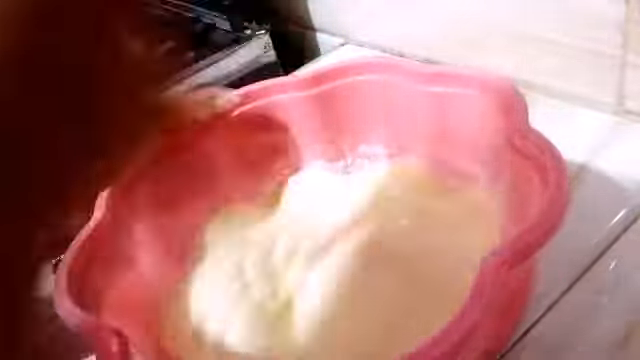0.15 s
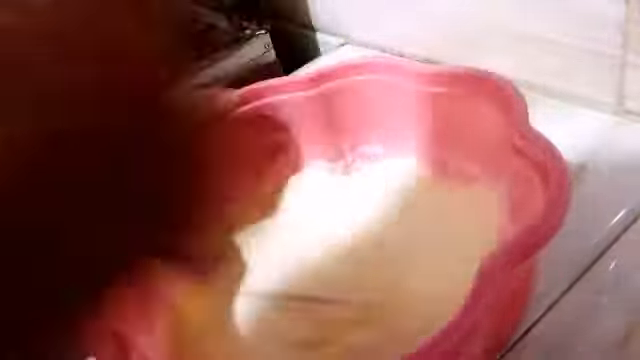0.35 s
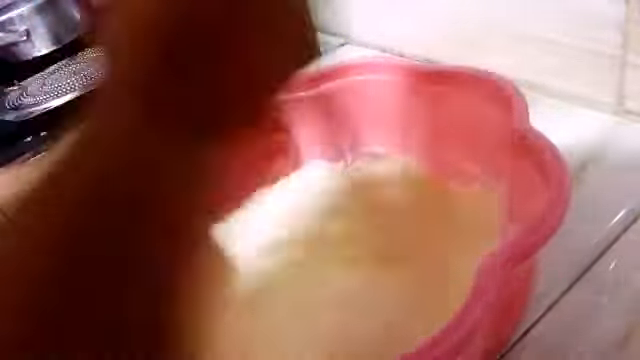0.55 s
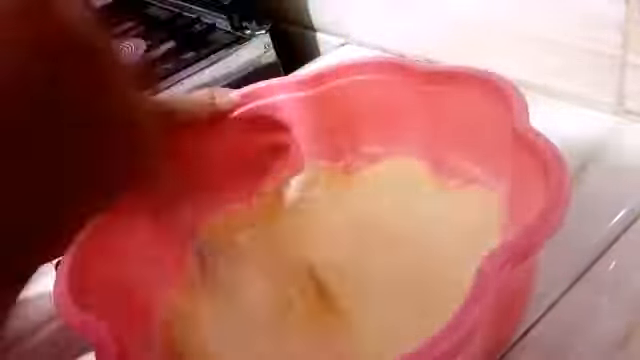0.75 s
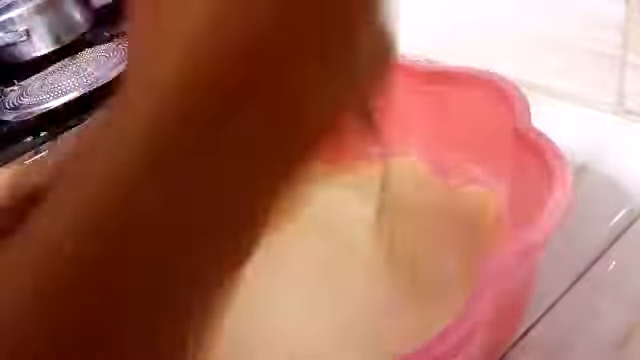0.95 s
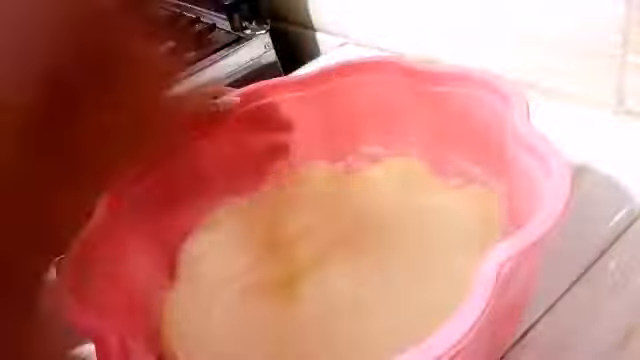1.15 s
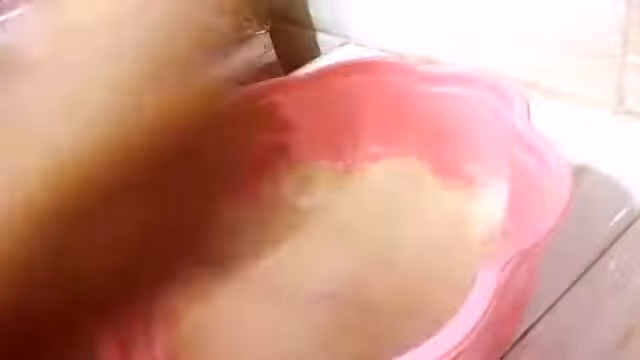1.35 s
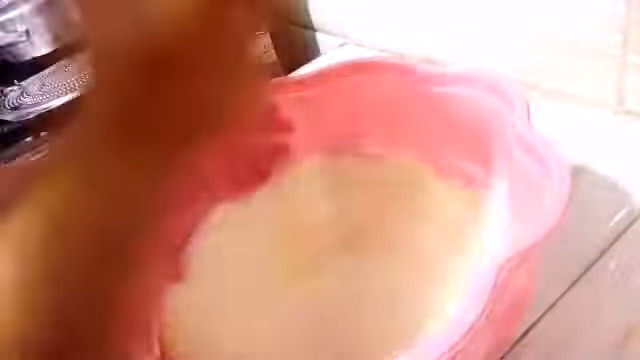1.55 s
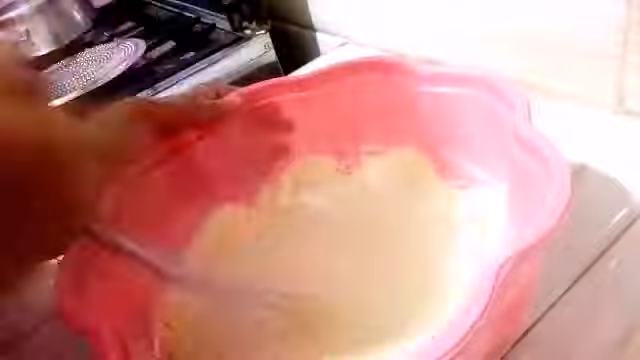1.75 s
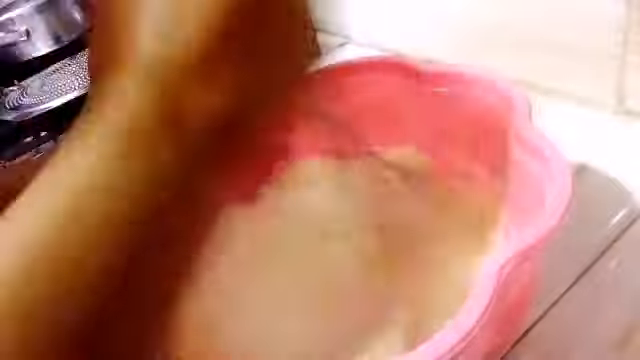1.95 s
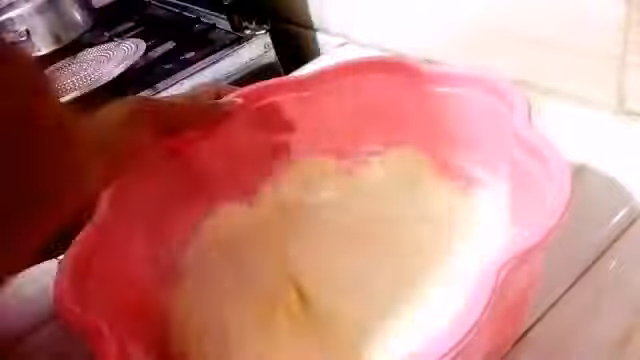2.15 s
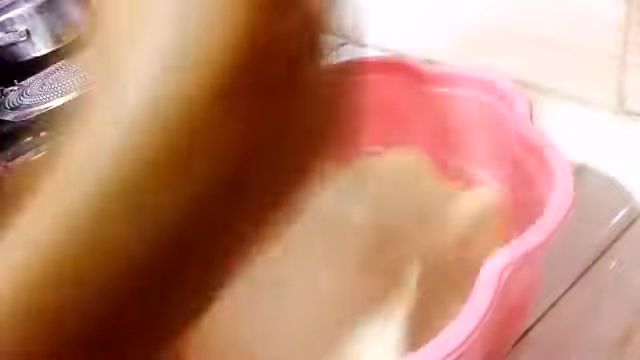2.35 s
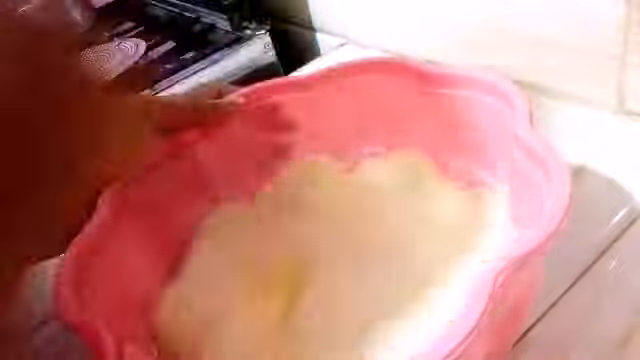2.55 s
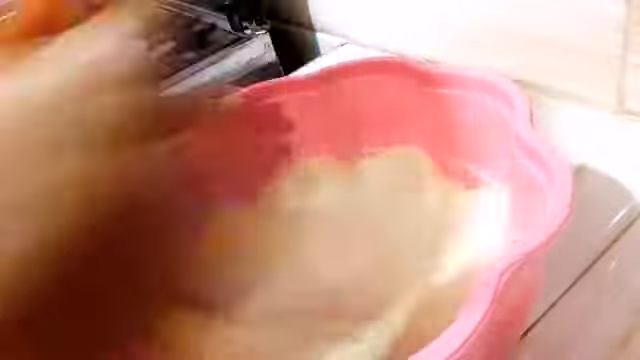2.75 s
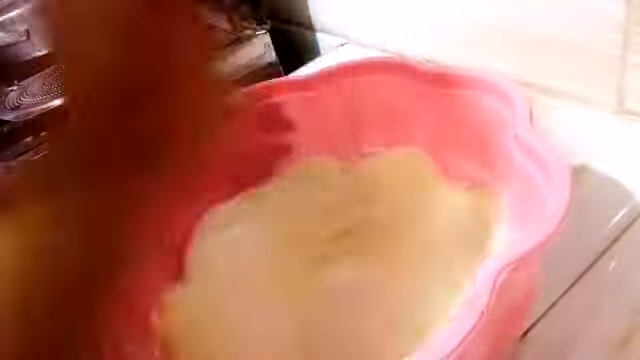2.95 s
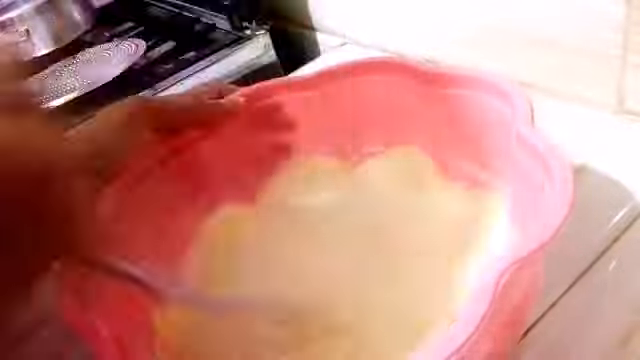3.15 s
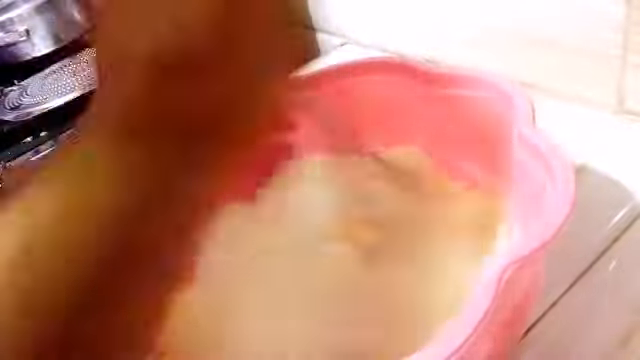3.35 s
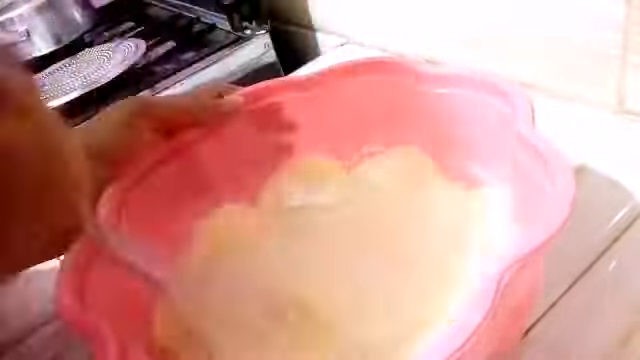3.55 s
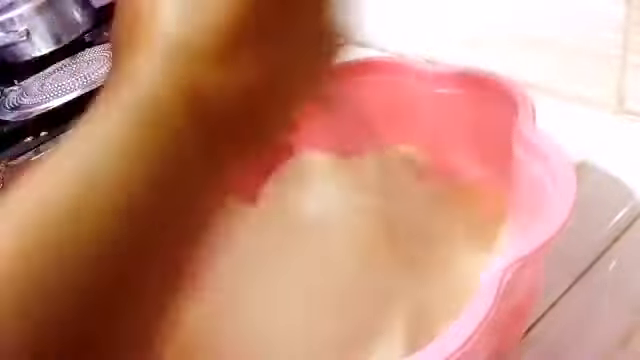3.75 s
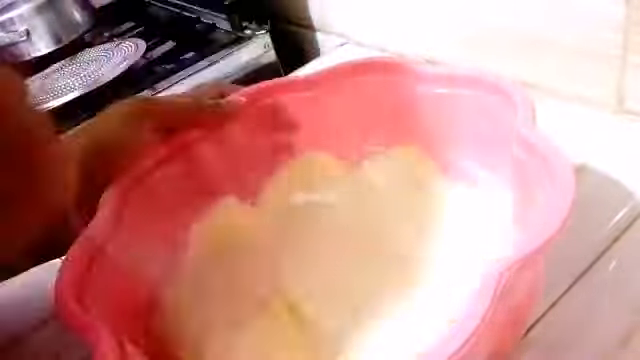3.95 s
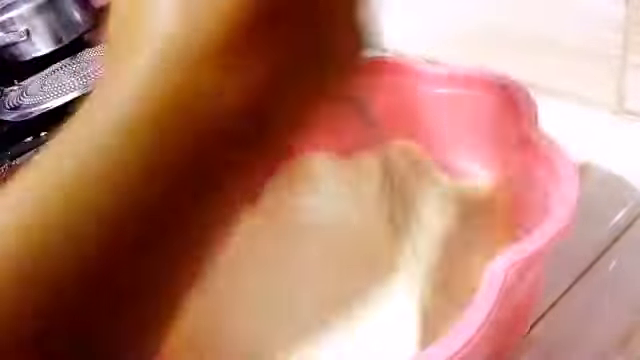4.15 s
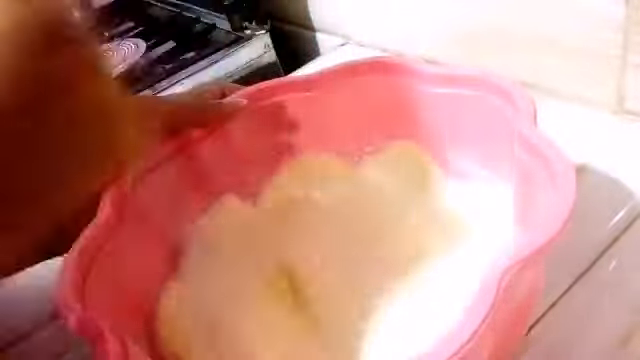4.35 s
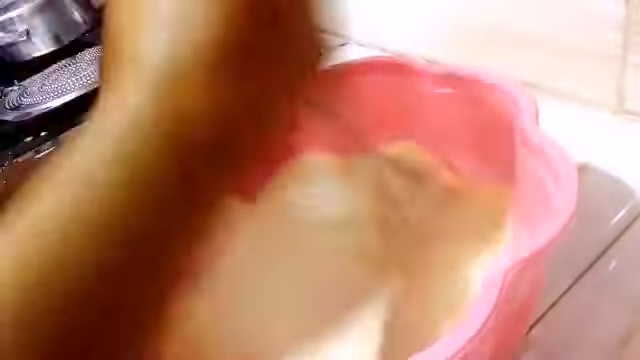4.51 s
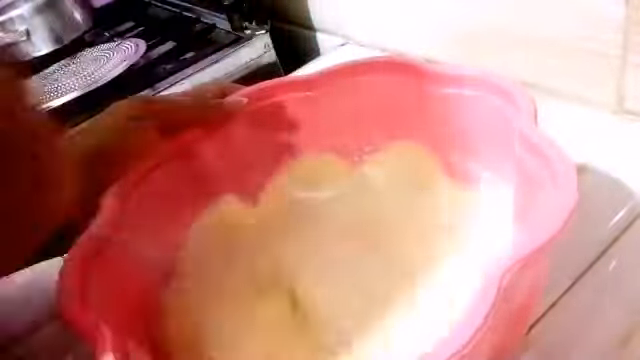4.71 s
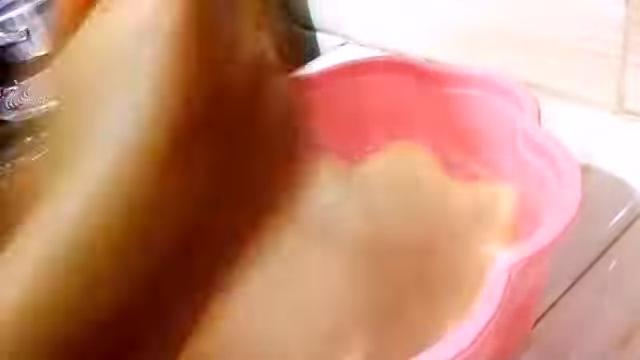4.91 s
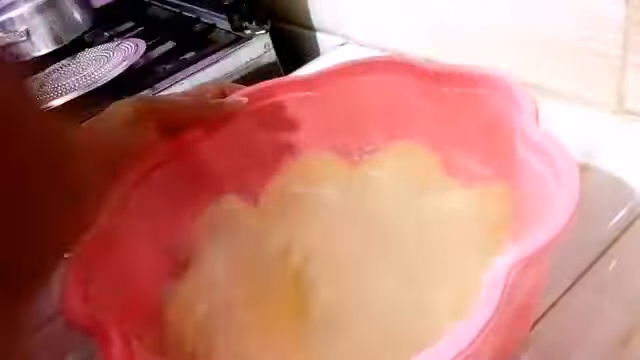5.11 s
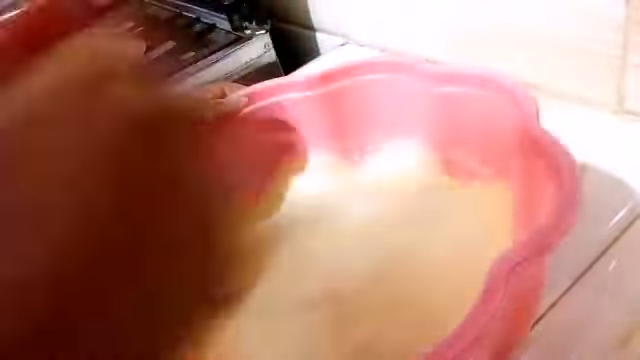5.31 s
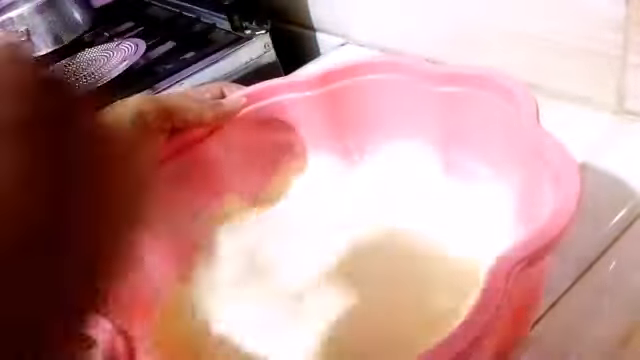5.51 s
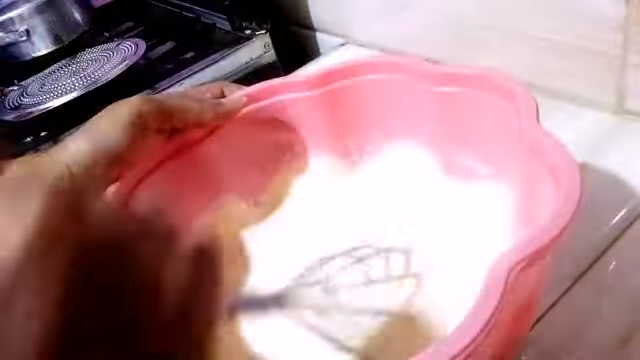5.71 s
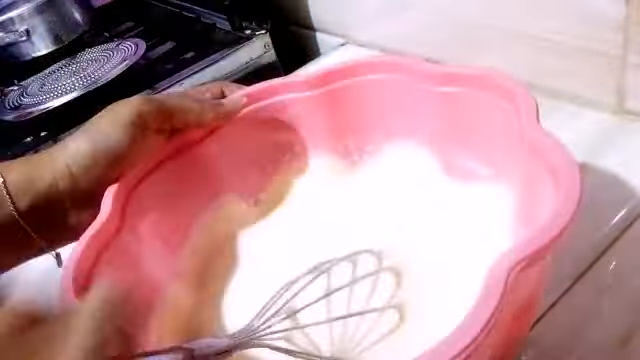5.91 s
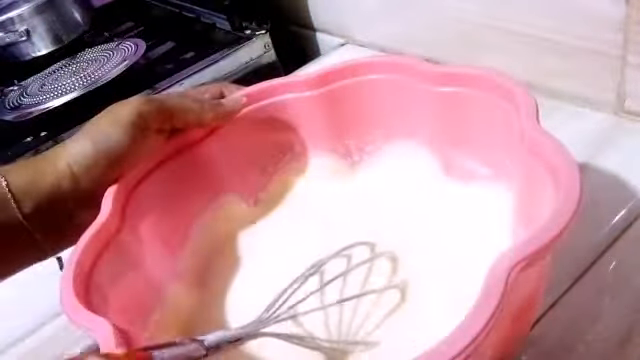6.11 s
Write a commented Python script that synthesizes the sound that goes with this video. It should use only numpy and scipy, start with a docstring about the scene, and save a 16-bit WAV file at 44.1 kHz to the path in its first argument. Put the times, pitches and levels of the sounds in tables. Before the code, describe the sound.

Fast whisking of wet batter rattles against a plastic bowl, dies away, and ends with a knock on the rim.

```python
"""A tiled kitchen: close to a small microphone, a wire whisk circles a scalloped plastic bowl of batter.
The wires strike rib after rib of the wall: a tick, a rattle of wires, and the ring of the bowl,
which thumps as it rocks on its base. Batter splashes with the blows and swishes between them.
The whisking dies out and the handle knocks on the rim. Short reflections and room tone sit behind."""
import sys
import numpy as np
from scipy import signal
from scipy.io import wavfile
from scipy.ndimage import uniform_filter1d

SR = 44100
rng = np.random.default_rng(int(sys.argv[2]) if len(sys.argv) > 2 else 0)


def dump_mix(stems):
    """Bounce the given channels to the path in sys.argv[1] as a 16-bit WAV at rate SR."""
    frames = np.atleast_2d(stems).T  # one column per channel
    limited = np.clip(frames, -1, 1)  # hard clip at full scale
    pcm = np.round(limited * 32767).astype(np.int16)
    wavfile.write(sys.argv[1], SR, pcm)


N = 272088
ONSET_DELAY_S = 0.000891  # short delay before each blow, tick and splash
# wires striking the wall: start_s, crack_db, belly_db, rim_db, wall_patch_hz, splash_db
WIRE_BLOWS = [(0.0014, -17.5, -32.5, -36, 1080, -29), (0.0074, -15.5, -43, -44, 960, -29.5),
              (0.029, -22, -38, -47, 1210, -44), (0.0554, -17, -34.5, -36, 954, -35),
              (0.1226, -31, -73, -75, 1120, -46), (0.1431, -34, -36.5, -48.5, 990, -41),
              (0.2276, -42, -67, -63, 1000, -57), (0.251, -23, -36, -38, 1440, -41.5),
              (0.279, -17, -32, -35.5, 1350, -31.5), (0.3197, -16, -31, -37.5, 1115, -28.5),
              (0.373, -22.5, -32.5, -42, 930, -32.5), (0.395, -26, -40, -58, 930, -42),
              (0.445, -28, -61, -62, 1420, -50), (0.4516, -21, -28.5, -39, 950, -33),
              (0.5143, -26, -42, -32.5, 1420, -40), (0.5552, -45, -71, -72, 985, -61),
              (0.5747, -19, -30, -31, 1510, -31), (0.6049, -14, -33, -34.5, 1340, -29.5),
              (0.6587, -18.5, -38.5, -47, 1220, -34.5), (0.705, -24.5, -39, -50, 935, -38.5),
              (0.758, -58, -85, -75, 1020, -50.5), (0.817, -18.5, -38, -36.5, 1410, -35),
              (0.855, -19.5, -34, -41.5, 890, -29.5), (0.8889, -25, -37, -33.5, 1450, -32),
              (0.927, -34, -43, -56, 1530, -36.5), (0.9498, -15.5, -30, -41, 1380, -31.5),
              (1.0134, -19.5, -40, -47, 1205, -33.5), (1.073, -32, -50, -51.5, 1130, -39.5),
              (1.1163, -30, -70, -49, 1080, -45), (1.1465, -36, -46, -46.5, 1270, -42),
              (1.1827, -49, -58, -58, 1290, -46.5), (1.2137, -25, -38.5, -51, 810, -51),
              (1.2277, -16.5, -27, -35.5, 1500, -39.5), (1.262, -43, -50, -52, 1380, -36),
              (1.283, -16, -28.5, -36, 1440, -30), (1.3468, -22, -35.5, -39.5, 1120, -27.5),
              (1.3957, -22.5, -37.5, -46.5, 970, -37.5), (1.45, -34, -58, -58, 970, -45),
              (1.481, -37, -44, -44.5, 1500, -48), (1.516, -30.5, -41, -38, 1460, -41),
              (1.5646, -17, -38.5, -40, 804, -39), (1.5795, -18.5, -34, -34.5, 1480, -31),
              (1.6432, -20.5, -36, -32.5, 1390, -31), (1.683, -32, -53, -52, 1310, -36.5),
              (1.7108, -17, -37, -46, 1160, -32.5), (1.7524, -39, -50, -66, 1240, -54),
              (1.8789, -27.5, -36.5, -35.5, 1310, -38.5), (1.9431, -17, -31.5, -32.5, 1480, -34.5),
              (1.978, -33, -46, -40, 1530, -36), (1.994, -17.5, -34.5, -40, 1270, -30),
              (2.0432, -17, -32.5, -40.5, 1060, -29), (2.1005, -20.5, -36.5, -51, 954, -38),
              (2.1175, -26.5, -61, -68, 950, -53), (2.1819, -30, -71, -46, 1240, -51),
              (2.2283, -23.5, -38.5, -37.5, 1300, -33), (2.2706, -20.5, -43, -67, 840, -60),
              (2.2897, -20.5, -34, -36, 1510, -39), (2.3252, -33, -48, -52, 1070, -34.5),
              (2.347, -22, -32.5, -31.5, 1250, -30), (2.3488, -17, -62, -38, 1330, -42),
              (2.3833, -36, -47.5, -47, 1440, -37), (2.3969, -13.5, -33.5, -51, 1040, -28.5),
              (2.4108, -27, -46, -40, 1230, -49), (2.445, -20.5, -40.5, -40, 940, -36),
              (2.516, -29, -41, -45, 1000, -47), (2.5289, -21.5, -39, -43, 870, -38.5),
              (2.595, -41, -57, -65, 877, -48.5), (2.6457, -17.5, -33, -34.5, 1470, -38),
              (2.6816, -26, -43, -42, 1150, -33), (2.7012, -14.5, -37, -27, 1390, -29),
              (2.7476, -12.5, -30.5, -40, 1085, -33.5), (2.804, -19, -41, -46, 940, -44),
              (2.9431, -26.5, -38.5, -45, 1310, -42), (2.9774, -23.5, -41, -46, 830, -39),
              (3.0042, -21.5, -37, -37, 1450, -45), (3.041, -32, -35.5, -53, 1080, -34),
              (3.0678, -14, -31, -32.5, 1310, -31.5), (3.1152, -17.5, -31.5, -39, 1090, -31),
              (3.1633, -21.5, -41.5, -54, 970, -37), (3.182, -33, -43, -65, 895, -49),
              (3.23, -37, -68, -67, 1060, -50), (3.247, -27, -37.5, -45, 1540, -41),
              (3.2967, -26.5, -42.5, -63, 850, -50), (3.3035, -38, -50, -35, 855, -40.5),
              (3.3613, -20, -35, -39, 1470, -37.5), (3.4, -32, -39, -66, 1310, -33),
              (3.4263, -20, -33.5, -35, 1360, -37), (3.459, -32, -45, -63, 1310, -36.5),
              (3.483, -15.5, -35.5, -51, 1140, -38), (3.5074, -32, -44, -54, 1000, -37),
              (3.541, -23, -42, -48, 990, -43.5), (3.62, -25.5, -35, -59, 880, -45.5),
              (3.6625, -30, -40, -37, 865, -44.5), (3.714, -29, -36, -36, 830, -33),
              (3.7363, -21.5, -33, -41, 1430, -35), (3.7764, -27, -44, -44, 980, -34.5),
              (3.8026, -19.5, -37.5, -37, 1390, -32), (3.861, -17.5, -34.5, -44, 1165, -31.5),
              (3.9071, -22, -38.5, -43, 990, -38), (3.98, -40, -62, -69, 1010, -58),
              (4.003, -35, -37.5, -47.5, 970, -44), (4.1097, -16.5, -30.5, -34.5, 1540, -33.5),
              (4.1598, -37, -41, -61, 1120, -40.5), (4.186, -21.5, -36, -38, 1300, -34.5),
              (4.2263, -35, -46, -45, 1380, -36.5), (4.2422, -15.5, -31, -33, 1260, -34),
              (4.2837, -25.5, -42, -43, 1010, -34), (4.354, -51, -73, -67, 1120, -51),
              (4.4187, -38, -42.5, -43.5, 820, -44.5), (4.4771, -23.5, -35.5, -36, 830, -50),
              (4.4908, -18, -37, -42, 1470, -37), (4.5177, -31, -40, -62, 1320, -35.5),
              (4.5522, -21, -36.5, -35, 1430, -33.5), (4.588, -30, -39.5, -53, 1140, -40),
              (4.619, -19.5, -40.5, -46, 1185, -34.5), (4.6679, -26.5, -40.5, -46, 980, -43),
              (4.7097, -36, -54, -54, 851, -44), (4.7337, -28, -33.5, -51, 930, -38),
              (4.787, -25.5, -40.5, -36, 885, -41), (4.8549, -18, -29, -36, 1430, -30.5),
              (4.9009, -50, -46, -45, 1610, -39.5), (4.9188, -13, -34.5, -38, 1240, -31),
              (4.9581, -23.5, -35.5, -45, 1160, -37), (4.9696, -19, -38, -48, 1020, -34.5),
              (5.0113, -49, -58, -65, 1090, -60), (5.032, -30, -45, -54, 970, -61),
              (5.0758, -34.5, -59, -55, 1020, -47.5), (5.2, -62, -59, -61, 1030, -61),
              (5.241, -63, -62, -67, 1030, -54), (5.252, -23, -38.5, -43, 1320, -37),
              (5.3296, -35, -43, -49.5, 1110, -44), (5.3642, -39, -66, -62, 970, -53),
              (5.383, -27.5, -59, -50, 1070, -45), (5.437, -34.5, -52.5, -55, 1020, -62),
              (5.4822, -43, -51.5, -55.5, 1000, -50.5), (5.565, -59, -80, -66, 1080, -61),
              (5.5946, -54, -73, -75, 832, -66)]
# the handle knocking on the rim: same columns
HANDLE_KNOCKS = [(5.9129, -15, -50, -33, 870, -35), (5.967, -39, -63, -52, 820, -68),
                 (6.111, -70, -68, -63, 870, -70)]
# modes of the bowl's belly: pitch_hz, level_db, t60_s
BELLY_MODES = [(284.7, -1.5, 0.064), (313, 0, 0.079), (343.3, 3, 0.065), (382.2, -4.5, 0.072),
               (469, 6, 0.038)]
# modes of the bowl's base: pitch_hz, level_db, t60_s
BASE_MODES = [(103, -11.5, 0.17), (162, -14.5, 0.13), (190.8, 0.5, 0.12), (234.4, -2.5, 0.12)]


def gain_of(db):
    """Decibels to amplitude."""
    return 10 ** (np.asarray(db) / 20)


def unit_rms(x):
    """Scales to rms 1."""
    return x / np.sqrt(np.mean(x ** 2) + 1e-20)


def curve_at(points, hz):
    """Reads a table on a log-frequency axis."""
    f, value = np.transpose(points)
    return np.interp(np.log(hz + 1), np.log(f + 1), value)


def equalise(x, points):
    """Minimum-phase EQ from a table of frequency_hz, gain_db."""
    log_gain = np.log(gain_of(curve_at(points, abs(np.fft.fftfreq(4096, 1 / SR)))))
    taps = np.fft.ifft(np.exp(np.conj(signal.hilbert(log_gain)))).real[:2048]
    return signal.oaconvolve(x, taps)[:len(x)]


def ring(modes, t, chance, spread_db, rise_ms):
    """Dying sines, rms 1 at the start; the three rows of chance vary their level, tuning and phase."""
    hz, db, t60 = np.transpose(modes)[:, :, None]
    weight, detune, phase = chance[:, :len(modes), None]
    cycles = hz * (1 + .03 * detune) * t + .12 * phase
    sound = (gain_of(db + spread_db * weight - 60 * t / t60) * np.sin(2 * np.pi * cycles)).sum(0)
    sound *= 1 - np.exp(-1000 * t / rise_ms)
    return sound / np.sqrt(np.mean(sound[:700] ** 2))


def room_tone():
    """A faint, steady bed of low noise."""
    # kitchen air: frequency_hz, gain_db
    room_eq = [(18, -80), (30, -46), (101, -10), (262, -16), (307, -10), (508, -17.5), (683, -12.5),
               (1350, -28.5), (5090, -26.5), (7000, -40), (9100, -55.5), (15400, -120)]
    return gain_of(-66) * unit_rms(equalise(rng.standard_normal(N), room_eq))


def tile_reflections(x):
    """Three short tails of room reflections, slowly crossfading for an even, diffuse sound."""
    # decay of the tiled room: frequency_hz, t60_s
    decay = [(150, 0.28), (600, 0.29), (1400, 0.22), (3700, 0.19), (8000, 0.19)]
    out, turn = np.zeros(N), np.pi * np.arange(N) / SR / .45
    for k in range(3):
        taps = np.zeros(SR // 2)
        at = np.arange(200, len(taps) - 20, 20)
        taps[at + rng.integers(0, 20, len(at))] = rng.choice([-1., 1.], len(at))
        hz, t, bands = signal.stft(taps, SR, nperseg=128)
        tail = signal.istft(bands * gain_of(-60 * t / curve_at(decay, hz)[:, None]), SR, nperseg=128)[1]
        send = np.sqrt(2 / 3) * abs(np.cos(turn + k * np.pi / 3))
        out += signal.fftconvolve(x * send, tail / np.linalg.norm(tail))[:N]
    return out


def faint_tones():
    """Two brief sine tones swell and fade in the lulls."""
    # soft swells: centre_s, half_width_s, pitch_hz, level_db
    swells = [(.2, .04, 988, -54), (5.875, .035, 431, -61)]
    t = np.arange(N) / SR
    return sum(gain_of(db) * np.exp(-((t - centre_s) / half_s) ** 2) * np.sin(2 * np.pi * hz * t)
               for centre_s, half_s, hz, db in swells)


def bubbles():
    """Tiny bursting bubbles, each a few cycles of rising pitch."""
    per_s = 4000
    bursts = gain_of(3 * np.minimum(rng.exponential(1, N), 3.5)) * (rng.random(N) < per_s / SR)
    pitch_index, out = rng.integers(0, 24, N), np.zeros(N)
    for k, hz in enumerate(np.geomspace(800, 7500, num=24)):
        cycles = np.arange(0, 7.5, hz / SR)
        pop = np.sin(2 * np.pi * cycles * (1 + 0.0084 * cycles)) * cycles * np.exp(-cycles / 0.46)
        out += signal.oaconvolve(bursts * (pitch_index == k), unit_rms(pop))[:N]
    return unit_rms(out)


def squelch(x, depth_db=4):
    """The batter squelches now in one band, now in another: patches of the spectrum swell and sink."""
    bands = signal.stft(x, nperseg=256, noverlap=192)[2]
    patches = uniform_filter1d(rng.standard_normal(bands.shape), size=4, axis=0)
    patches = unit_rms(uniform_filter1d(patches, size=8, axis=1))
    return unit_rms(signal.istft(bands * gain_of(depth_db * patches), nperseg=256, noverlap=192)[1][:N])


def batter_fizz():
    """Wire slipping on wet plastic and bubbles bursting blend into a fluttering wet texture."""
    # tone of the wet batter: frequency_hz, gain_db
    batter_eq = [(400, -38), (1000, -11), (1900, 4.5), (2700, 0.5), (3500, 3), (4600, 7.5), (6000, 8.5),
                 (8000, -0.5), (16000, -25)]
    slips_per_s = 6000
    slip_size = gain_of(2.5 * np.minimum(rng.exponential(1, N), 5))
    slips = slip_size * rng.standard_normal(N) * (rng.random(N) < slips_per_s / SR)
    flutter = gain_of(2.2 * unit_rms(uniform_filter1d(rng.standard_normal(N), 300)))
    return squelch(equalise((0.95 * unit_rms(slips) + bubbles()) * flutter, batter_eq))


def splash_envelope():
    """Batter bursts at each blow; a splash near the crack in level swells and ebbs instead."""
    start_s, crack_db, *_, splash_db = np.transpose(WIRE_BLOWS + HANDLE_KNOCKS)
    at = np.round((start_s + ONSET_DELAY_S) * SR).astype(int)
    swept_share = 1 / (1 + gain_of(2 * (crack_db - splash_db + 2.5)))
    power = gain_of(2 * splash_db)
    thrown, swept = np.zeros((2, N))
    np.add.at(thrown, at, (1 - swept_share) * power)
    np.add.at(swept, at, swept_share * power)
    t = np.arange(6000) / SR
    sweep_delay_s, sweep_width_s = 0.0036, 0.0085
    sweep = np.exp(-((t[:4001] - t[2000] - sweep_delay_s) / sweep_width_s) ** 2)
    ebb = 1.52 * np.exp(-t / 0.0044) + 0.15 * np.exp(-t / 0.017)
    burst = ebb * (1 - np.exp(-t / 0.0011)) ** 2
    burst_power = 2.02 * signal.oaconvolve(thrown, burst)[:N]
    sweep_power = 2.4 * signal.oaconvolve(swept, sweep, "same")
    return np.sqrt(abs(burst_power + sweep_power))


def batter_swish():
    """Splashes on the blows, a thin drag between them, and the bowl's low modes rumbling along."""
    # wires dragged through the batter: time_s, drag_db, rumble_db
    stirring = [(0.0, -36, -37.5), (0.09, -62, -55), (0.18, -56, -57), (0.27, -59.0, -60), (0.36, -60, -60),
                (0.45, -53, -57.0), (0.54, -55, -55), (0.63, -47.0, -47), (0.72, -55, -55),
                (0.81, -57, -72), (0.9, -40, -57), (0.99, -46, -52.0), (1.08, -61, -62), (1.17, -58, -68.0),
                (1.26, -45, -55), (1.35, -48, -50), (1.44, -54, -59), (1.53, -60, -53), (1.62, -41, -47),
                (1.71, -61, -62), (1.8, -50.5, -64), (1.891, -64, -71), (1.98, -59, -56),
                (2.07, -66, -52.0), (2.16, -50, -74), (2.25, -62, -67), (2.34, -53, -53.0),
                (2.43, -57, -49.5), (2.52, -53, -53), (2.61, -61, -65), (2.7, -46.0, -56.0),
                (2.79, -48, -46), (2.88, -55, -80.0), (2.97, -59, -57.0), (3.06, -42, -52.0),
                (3.15, -49, -55), (3.24, -65, -62), (3.33, -67, -54), (3.42, -51.0, -53), (3.51, -53, -55),
                (3.6, -48, -55), (3.69, -56, -54), (3.78, -54, -53), (3.87, -37, -58.0), (3.96, -69, -64),
                (4.05, -61.5, -84), (4.14, -50, -68), (4.23, -49, -62), (4.32, -52, -67.0),
                (4.41, -63, -84), (4.5, -51, -59), (4.59, -46, -54.0), (4.68, -52, -69), (4.77, -57, -53.5),
                (4.86, -56, -71), (4.95, -52, -53), (5.04, -49.5, -70), (5.14, -66.0, -70), (5.2, -49, -69),
                (5.4, -55, -62), (5.52, -57.5, -69.0), (5.6, -51, -84), (5.7, -61.0, -78),
                (5.77, -69, -69.0), (5.82, -63.5, -66.5), (5.9, -85.0, -65), (5.96, -54, -49),
                (6.05, -73, -78), (6.17, -82.0, -67)]
    # thins the fizz for the drag: frequency_hz, gain_db
    drag_eq = [(1000, -4), (1700, -16), (2300, -7), (3000, 1.5), (6000, -5)]
    time_s, drag_db, rumble_db = np.transpose(stirring)
    t = np.arange(N) / SR
    fizz = batter_fizz()
    low_modes = BASE_MODES + BELLY_MODES + [(637.0, 7.4, 0.11)]
    body = ring(low_modes, t[:5000], np.zeros((3, 10)), spread_db=0, rise_ms=0.16)
    rumble = unit_rms(signal.oaconvolve(rng.standard_normal(N), body)[:N])
    rumble *= 1.4 * gain_of(np.interp(t, time_s, rumble_db))
    drag = unit_rms(equalise(np.roll(fizz, N // 2), drag_eq))
    drag *= gain_of(np.interp(t, time_s, drag_db))
    return splash_envelope() * fizz + drag + rumble


def base_thumps():
    """The bowl rocks on its base, each time with a low, soft-edged ring."""
    # rocks of the bowl: start_s, level_db, pitch_hz
    rocks = [(0.07, -57, 174), (0.147, -64, 188), (0.253, -31.5, 219), (0.321, -41, 220), (0.372, -50, 193),
             (0.445, -50, 220), (0.576, -41.5, 197), (0.815, -40.5, 181), (0.948, -37, 240),
             (1.012, -47, 250), (1.231, -42, 202), (1.28, -37, 241), (1.353, -39.5, 197),
             (1.586, -37.5, 195), (1.645, -34, 202), (1.875, -49, 240), (1.948, -34, 178),
             (1.989, -42, 199), (2.044, -43, 233), (2.222, -68, 228), (2.295, -38, 182),
             (2.357, -40.5, 234), (2.399, -52, 193), (2.536, -47, 178), (2.648, -36.5, 177),
             (2.704, -35.5, 197), (2.744, -51, 199), (2.804, -51, 157), (2.943, -79, 152),
             (3.005, -38, 192), (3.072, -37, 233), (3.119, -40, 204), (3.248, -54, 175),
             (3.361, -37.5, 211), (3.421, -34, 243), (3.481, -47, 203), (3.539, -45, 185),
             (3.615, -60, 157), (3.672, -46, 187), (3.741, -37, 186), (3.802, -32, 218), (3.858, -49, 225),
             (3.914, -44, 171), (4.105, -61, 171), (4.242, -45, 187), (4.284, -47, 197), (4.489, -43, 212),
             (4.556, -35, 193), (4.621, -47, 202), (4.734, -49, 148), (4.854, -40, 157), (4.919, -31, 198),
             (5.261, -48, 182), (5.329, -57, 244), (5.98, -59, 197)]
    t60_s = 0.083
    t, out = np.arange(6000) / SR, np.zeros(N + 6000)
    for start_s, db, hz in rocks:
        at = round(start_s * SR)
        thump = ring([(hz, 0, t60_s)], t, rng.standard_normal((3, 1)), spread_db=0, rise_ms=4)
        out[at:at + len(t)] += gain_of(db + 1) * thump
    return out[:N]


def wire_ticks():
    """A single wire slaps the plastic: one push and pull of the wall, then a brief ring."""
    # wire slaps: centre_s, level_db, pitch_hz
    slaps = [(0.002, -19, 2400), (0.0079, -13.5, 3580), (0.0107, -14, 3410), (0.015, -32, 3680),
             (0.0248, -27, 4150), (0.0284, -16, 5100), (0.0347, -26, 4420), (0.0559, -21.5, 2220),
             (0.0581, -17, 5100), (0.2286, -28, 5070), (0.2585, -28, 4100), (0.2795, -23, 2580),
             (0.3217, -18, 2490), (0.327, -14, 5600), (0.3741, -31, 4430), (0.3771, -25, 5210),
             (0.3952, -23.5, 2340), (0.4531, -20.5, 2000), (0.5161, -24, 2390), (0.5535, -28, 5710),
             (0.5748, -21, 2950), (0.5868, -28, 3270), (0.5905, -24, 4250), (0.6033, -22, 2860),
             (0.6059, -16, 3280), (0.6104, -24, 2440), (0.659, -17.5, 2870), (0.6625, -29, 3600),
             (0.6679, -29, 3950), (0.8168, -36, 3520), (0.8193, -24, 2410), (0.854, -19, 2850),
             (0.889, -21, 4200), (0.8927, -28, 3190), (0.9493, -16, 3600), (0.953, -18, 2880),
             (0.9556, -27, 4070), (0.9592, -31, 3790), (1.0143, -33, 2800), (1.0366, -20.5, 5570),
             (1.084, -32, 2770), (1.2278, -30, 2800), (1.2752, -28, 4990), (1.2833, -10.5, 3600),
             (1.2876, -21, 3070), (1.3496, -17, 5930), (1.3762, -25, 3750), (1.3965, -23, 2330),
             (1.4096, -21.5, 2570), (1.5649, -17.5, 2400), (1.5805, -12, 4300), (1.6454, -17.5, 3320),
             (1.6519, -25, 3180), (1.7126, -17.5, 3030), (1.7529, -22.5, 5300), (1.9434, -14.5, 4010),
             (1.9802, -27, 4720), (1.995, -17, 3540), (1.9975, -13.5, 3000), (2.0435, -17, 2600),
             (2.047, -17, 4000), (2.0516, -32, 4270), (2.102, -25, 2490), (2.1197, -24, 2240),
             (2.2728, -27, 2400), (2.2902, -16.5, 4000), (2.2934, -22, 4290), (2.3333, -22, 4120),
             (2.3471, -24, 3360), (2.3501, -16.5, 3240), (2.3828, -19, 4630), (2.397, -19, 2820),
             (2.4061, -11, 6100), (2.4102, -18, 4740), (2.4141, -16, 5160), (2.4218, -36, 4430),
             (2.4474, -37, 2270), (2.4505, -23, 4500), (2.6464, -16, 3860), (2.685, -29, 4310),
             (2.7004, -21.5, 2840), (2.7054, -20, 3870), (2.7105, -16, 3860), (2.7483, -17, 2580),
             (2.7647, -24, 3880), (2.7758, -22, 5240), (2.8052, -45, 2280), (2.9783, -25.5, 2310),
             (2.9839, -35, 3420), (3.0042, -20, 3130), (3.0071, -20.5, 4970), (3.0663, -19.5, 3010),
             (3.0692, -22, 3760), (3.1162, -18.5, 2720), (3.1253, -20, 3730), (3.1349, -22, 5320),
             (3.1375, -31, 3600), (3.164, -26, 5330), (3.1829, -22, 2350), (3.361, -16, 4140),
             (3.402, -22, 4500), (3.4095, -28, 4140), (3.4234, -25, 2420), (3.4274, -28, 2570),
             (3.4303, -36, 3120), (3.4829, -17.5, 2460), (3.5128, -36, 5210), (3.7115, -28, 2490),
             (3.7156, -23, 4770), (3.7364, -18, 4320), (3.7401, -16.5, 4200), (3.7781, -19.5, 5190),
             (3.8023, -18, 2650), (3.8632, -17.5, 2800), (3.8697, -17, 5600), (3.886, -29, 5440),
             (3.9066, -18, 5500), (3.914, -21, 2600), (3.9286, -25.5, 2560), (4.1094, -12.5, 4630),
             (4.1119, -12, 4700), (4.1866, -35, 3650), (4.2274, -31, 5180), (4.2431, -16, 2280),
             (4.2848, -21.5, 4800), (4.2896, -26, 4480), (4.4765, -24.5, 2210), (4.4916, -25, 2180),
             (4.4938, -22, 4160), (4.5533, -19.5, 3430), (4.5857, -32, 3810), (4.5908, -28, 4760),
             (4.62, -16, 2760), (4.8545, -23, 2790), (4.8703, -22, 3140), (4.9012, -20, 4650),
             (4.9198, -27, 3030), (4.9235, -17, 3500), (4.9265, -19, 3290), (4.9295, -32, 2910),
             (4.9578, -27, 3970), (4.9708, -16, 2770), (4.9905, -32, 4120), (5.0116, -22, 5800),
             (5.0306, -22, 4020), (5.2539, -15.5, 3800), (5.2569, -17.5, 4050), (5.3312, -26, 2900),
             (5.3644, -32, 3130), (5.3847, -29, 3200)]
    width_cycles, ring_db, ring_s = 0.47, -15.5, 0.001
    t, out = np.arange(400) / SR, np.zeros(N + 400)
    for centre_s, db, hz in slaps:
        at = round((centre_s + ONSET_DELAY_S) * SR - SR / hz / 2)
        envelope = np.exp(-((hz * t - .5) / width_cycles) ** 2) + gain_of(ring_db) * np.exp(-t / ring_s)
        out[at:at + len(t)] += gain_of(db + 3) * envelope * np.sin(2 * np.pi * hz * t)
    return out[:N]


def contact(t, first_db, rattle_ms, bright_db):
    """A first click, then a rattle; a glancing blow has a weak click and swells like a scrape."""
    grit = rng.standard_normal(len(t)) * rng.standard_normal(len(t)) ** 2
    rise_s = .0007 / gain_of(1.5 * first_db)
    rattle = .065 * grit * np.exp(-1000 * t / max(rattle_ms, .3)) * (1 - np.exp(-t / rise_s))
    rattle[0] = gain_of(first_db)
    dull = signal.lfilter([.35], [1, -.65], rattle)  # a blow through batter loses its top
    return 3.0 * dull + 6.7 * gain_of(bright_db) * (rattle - dull)


def bowl_body(t, patch_hz, chance):
    """Belly and base ring; where the struck patch rings high, the belly rings low and the base softer."""
    patch_octaves = np.log2(patch_hz / 1120)
    favoured = [(hz, db - 16 * abs(np.log2(hz / 319) + 0.17 * patch_octaves), .9 * t60)
                for hz, db, t60 in BELLY_MODES]
    belly = ring(favoured, t, chance, spread_db=1.45, rise_ms=7.2)
    base = ring(BASE_MODES, t, chance[::-1], spread_db=2.5, rise_ms=7)
    return belly + gain_of(-13.5 - 4 * patch_octaves) * base


def whisk_blows():
    """Wires or handle hit the bowl: a crack, then body, rim and the struck patch of wall ring."""
    # modes of the rim: pitch_ratio, level_db, t60_s
    rim_modes = [(1, -0.5, 0.058), (1.055, -1, 0.052), (1.14, -13, 0.048), (1.27, -13.5, 0.038)]
    # high, short modes of the wall: pitch_hz, level_db, t60_s
    wall_modes = [(1750, -3, .012), (2095, 0, .016), (2890, -1, .014), (3550, -2, .012), (4020, -2, .012),
                  (4690, -3, .01), (5300, -4, .01), (5980, -3, .01)]
    # tone of the crack: frequency_hz, gain_db
    crack_eq = [(250, -38.5), (700, 10.5), (1500, 1), (3000, 3.5), (5000, 1.5), (7000, -4.5), (9000, -16),
                (16000, -6.5)]
    t = np.arange(6000) / SR
    cracks, rings = np.zeros((2, N + 2 * len(t)))

    def strike(hits, scatter, bright_db, rattle_ms, first_db, wall_mix,
               rim_hz, rim_rise_ms, patch_db, ring_scale):
        """Adds one striker's hits; scatter varies their tone from blow to blow."""
        for start_s, crack_db, belly_db, rim_db, patch_hz, _ in hits:
            chance = rng.standard_normal((3, 8))
            offsets = scatter * rng.standard_normal(5) * (6.9, 0.33, 6.7, 0.018, 1.24)
            bright_offset, rattle_stretch, first_offset, rim_detune, patch_offset = offsets
            sharpen_db = 0.086 * (crack_db + 27)  # harder blows land with a sharper click
            crack = contact(t, first_db + first_offset + sharpen_db,
                            rattle_ms * np.exp(rattle_stretch), bright_db + bright_offset)
            wall = ring(wall_modes, t[:700], chance, spread_db=2, rise_ms=.05)
            crack += 0.043 * wall_mix * signal.fftconvolve(crack, wall)[:len(t)]
            tuned_rim = np.multiply(rim_modes, [rim_hz * np.exp(rim_detune), 1, ring_scale])
            rim = ring(tuned_rim, t, chance[:, ::-1], spread_db=2.1, rise_ms=rim_rise_ms)
            patch_mode = [(patch_hz, 0, 0.021 * ring_scale)]
            patch = ring(patch_mode, t, np.zeros((3, 1)), spread_db=0, rise_ms=0.64)
            at = round((start_s + ONSET_DELAY_S) * SR)
            span = slice(at, at + len(t))
            cracks[span] += gain_of(crack_db) * crack / abs(crack).max()
            rings[span] += gain_of(belly_db) * bowl_body(t, patch_hz, chance) + gain_of(rim_db) * rim
            rings[span] += gain_of(crack_db + patch_db + patch_offset) * patch

    strike(WIRE_BLOWS, scatter=1, bright_db=-9.5, rattle_ms=4, first_db=-7.5, wall_mix=1,
           rim_hz=645.5, rim_rise_ms=8, patch_db=-19, ring_scale=1.05)
    strike(HANDLE_KNOCKS, scatter=0, bright_db=-20, rattle_ms=0.9, first_db=-4, wall_mix=0.03,
           rim_hz=680, rim_rise_ms=1.2, patch_db=-12, ring_scale=0.5)
    return equalise(cracks, crack_eq)[:N] + 1.164 * rings[:N]


def scene():
    """The bowl up front, its reflections and the room tone behind, in mono."""
    bowl = whisk_blows() + wire_ticks() + base_thumps() + batter_swish() + faint_tones()
    return (bowl + gain_of(-10.5) * tile_reflections(bowl) + room_tone())[None]


def record(dry):
    """A small microphone that rolls off above 6 kHz, its faint hiss, then a steep low-pass."""
    # microphone response: frequency_hz, gain_db
    microphone_eq = [(25, -8.5), (55, -10.5), (120, -7.5), (6100, -4), (6800, -8), (7500, -17),
                     (8300, -24.5), (10000, -26), (13500, -23), (15200, -38)]
    heard = equalise(dry[0], microphone_eq) + gain_of(-88.0) * rng.standard_normal(N)
    low_pass = signal.firwin(511, 15800, window=("kaiser", 9), fs=SR)
    return signal.oaconvolve(heard, low_pass, "same")[None]


dry = scene()
out = record(dry)
dump_mix(out)
```